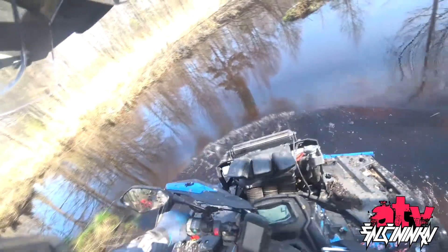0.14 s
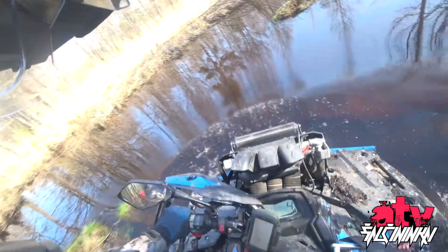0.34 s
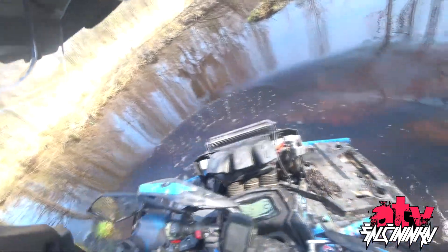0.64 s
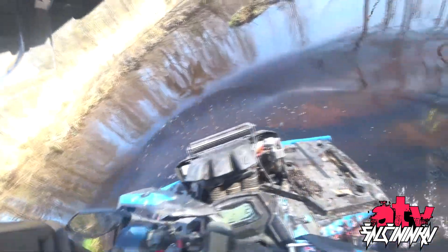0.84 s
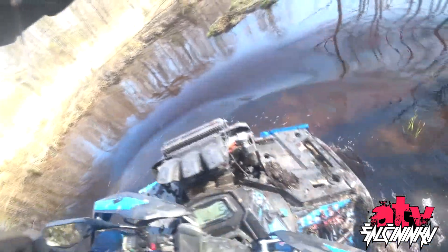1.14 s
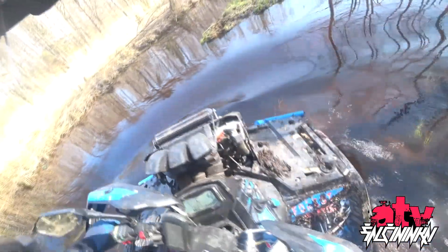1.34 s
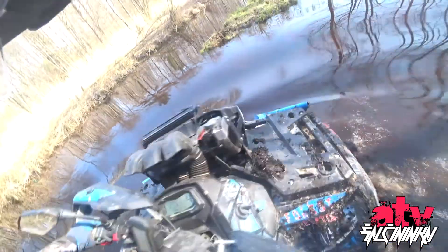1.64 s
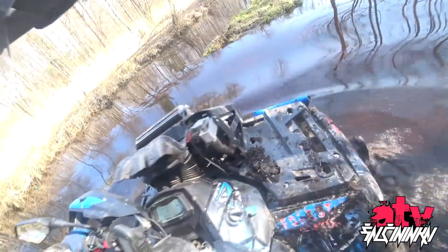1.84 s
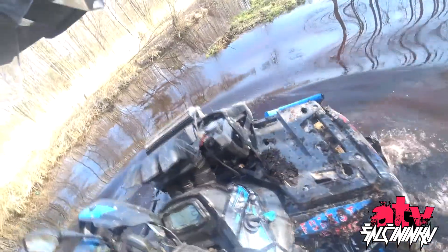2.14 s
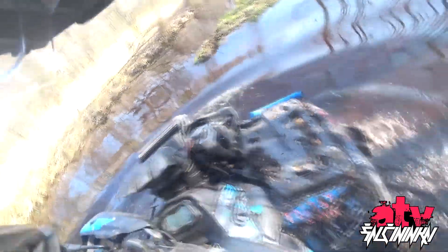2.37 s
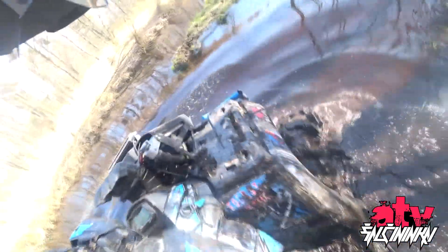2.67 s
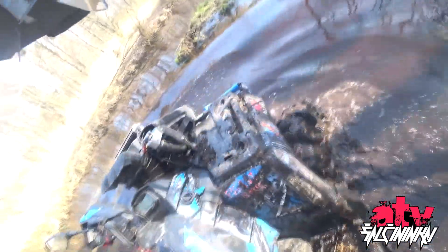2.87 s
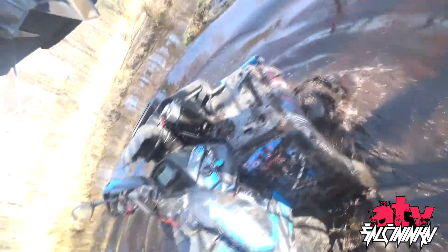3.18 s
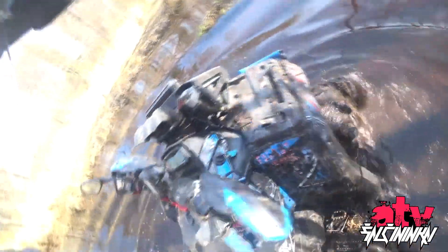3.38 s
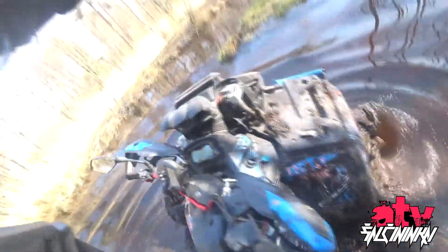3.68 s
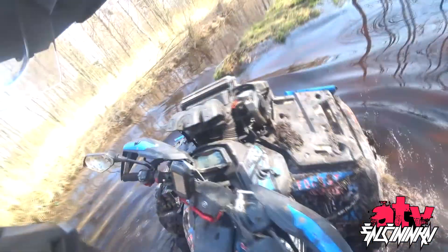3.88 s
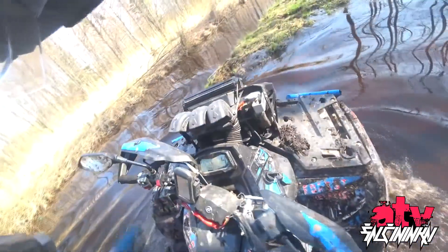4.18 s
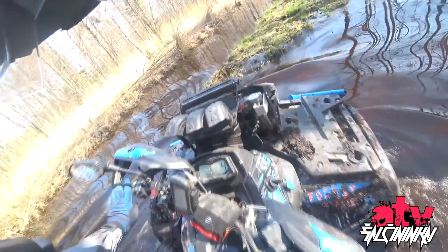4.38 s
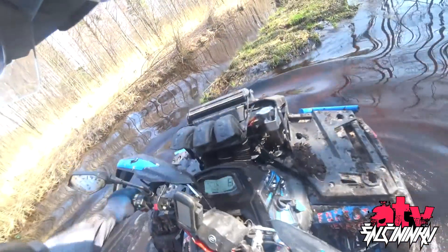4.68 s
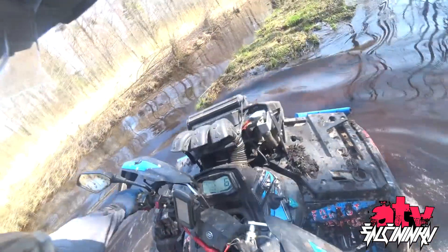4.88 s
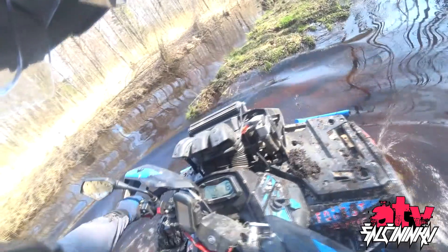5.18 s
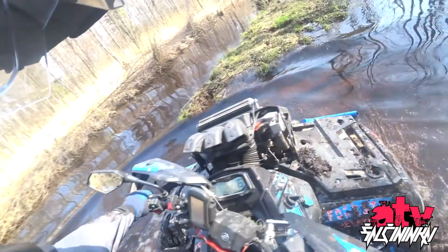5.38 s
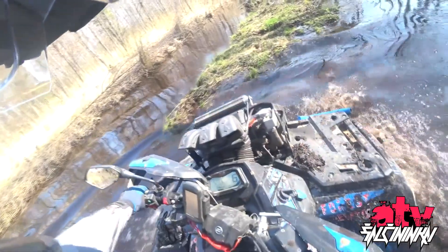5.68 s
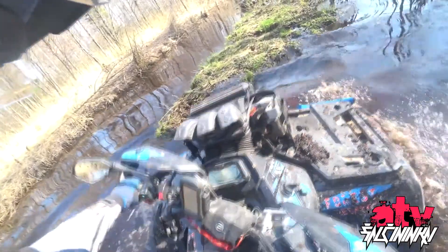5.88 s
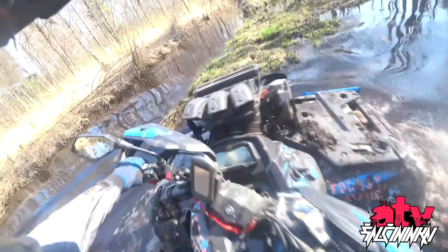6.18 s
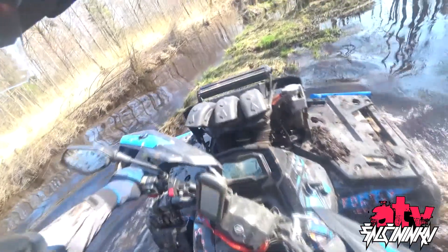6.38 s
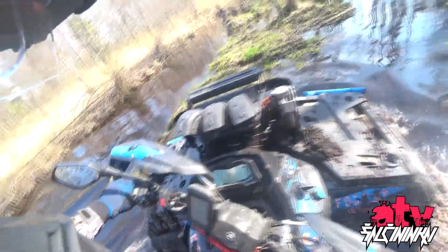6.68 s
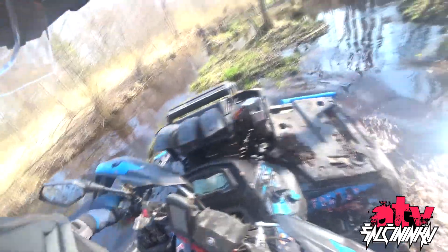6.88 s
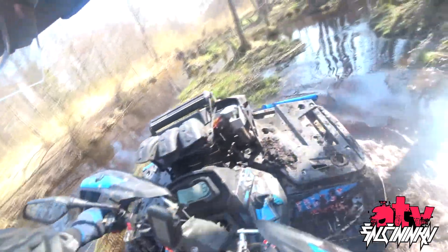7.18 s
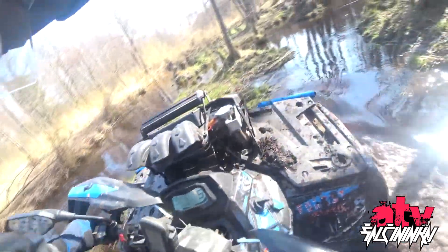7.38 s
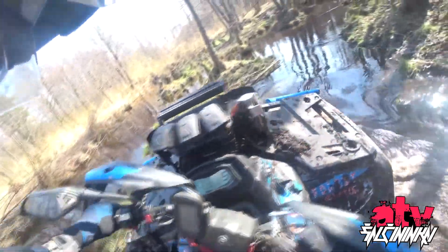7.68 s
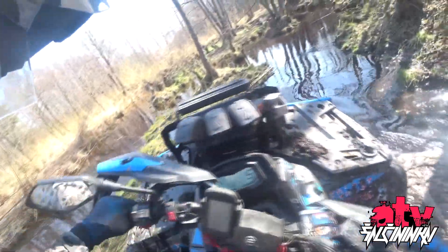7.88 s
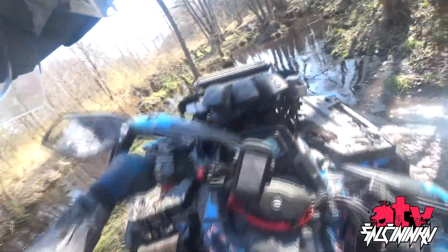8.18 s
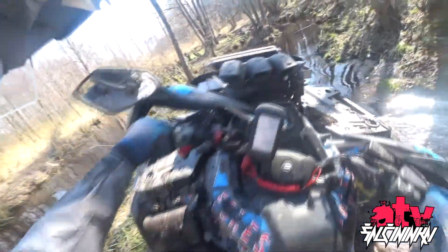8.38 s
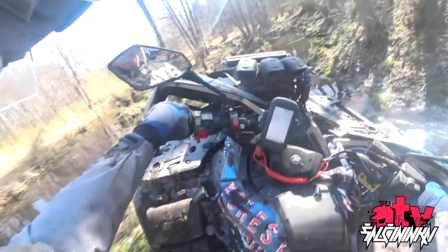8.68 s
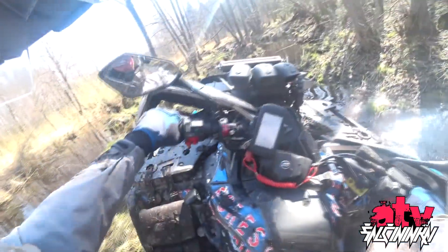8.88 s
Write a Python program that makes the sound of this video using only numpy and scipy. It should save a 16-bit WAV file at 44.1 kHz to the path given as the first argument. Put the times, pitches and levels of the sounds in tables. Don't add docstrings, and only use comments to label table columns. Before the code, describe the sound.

A twin-cylinder quad bike lugs through flooded ground, buzzing and rattling over hissing water, surging, slamming its driveline, revving hard, bogging, then pulling away.

```python
import sys
import numpy as np
from scipy import signal
from scipy.fft import rfft, irfft, next_fast_len
from scipy.io import wavfile
from scipy.ndimage import uniform_filter1d

SR = 44100
rng = np.random.default_rng(int(sys.argv[2]) if len(sys.argv) > 2 else 0)


def master(y):
    cut = np.clip(np.atleast_2d(y).T, -1, 1)
    pcm = np.round(cut * 32767)
    wavfile.write(sys.argv[1], SR, pcm.astype(np.int16))


def to_linear_factor(level_db):
    exponent = np.asarray(level_db, float) / 20
    return 10 ** exponent


N = 398223
FFT_LEN = next_fast_len(N)
TIME, BINS = np.arange(N) / SR, np.fft.rfftfreq(FFT_LEN, 1 / SR)
USUAL_HZ = 24.4

# (time [s], engine cycles per second [Hz])
SPEED = [(0.0, 21.49), (0.65, 20.93), (0.79, 24.92), (1.05, 25.6), (1.32, 25.51), (1.55, 21.24),
         (1.95, 22.27), (2.45, 23.58), (2.9, 22.44), (3.35, 22.46), (3.8, 23.66), (4.25, 22.89),
         (4.6, 24.45), (4.93, 28.36), (5.1, 28.72), (5.42, 31.69), (5.95, 26.04), (6.3, 29.62),
         (6.6, 25.84), (7.0, 26.72), (7.35, 27.39), (7.75, 25.03), (8.05, 24.74), (8.22, 19.49),
         (8.44, 19.69), (8.63, 27.51), (9.03, 26.42)]
# (place in cycle [0-1], strength [dB], front cylinder [1 or 0])
FIRINGS = [
    (.755, 0, 1),
    (.83, -9, 1),
    (.92, -12, 1),
    (.12, 0, 0),
    (.19, -9, 0),
    (.31, -13, 0),
]
# (frequency [Hz], width [Hz], left [dB], right [dB], right leads [rad])
PANELS = [(469, 180, -29, -29, -2.05), (571.2, 30.4, -11.5, -12, -1.33), (691.3, 22.3, -4.5, 0.5, -2.5),
          (710.2, 20.9, -1, 0, -2), (761.4, 66, -9.5, -10, -2.5), (901.4, 48.5, -12, -17.5, -2.5)]
# (frequency [Hz], width [Hz], left [dB], right [dB], right leads [rad])
BODY = [(1030, 70, -8, -11, 3.0), (1145, 80, -5, -7, 1.9), (1281, 65, -3, -6, 2.4), (1395, 80, -8, -6, 2.9),
        (1462, 55, 0, 0, 3.0), (1540, 60, -6, -7, -3.1)]
# (frequency [Hz], width [Hz], left [dB], right [dB], right leads [rad])
FRAME = [(1616.5, 44, 1, -5.5, 4), (1728.4, 46, -5, -3, 0.48), (1826.4, 26, -8, -4, 0.2)]
# (frequency [Hz], width [Hz], left [dB], right [dB], right leads [rad])
COVERS = [(2570, 90, -5, -6, -3.0), (2700, 120, -4, -2, -2.4), (2830, 190, 0, -2, -1.8),
          (3445, 220, -10, -12, 2.9)]
# (frequency [Hz], width [Hz], left [dB], right [dB], right leads [rad])
PORT = [(4220, 240, -38, -53, -4), (5253, 640, 7, 10, -1.85)]
# (start [s], end [s], upper hum [dB], outlet hiss [dB])
SURFACING = [
    (2.4, 4.4, 0, 4),
    (6.15, 7.35, 3.5, -2),
    (7.45, 8.1, 4.5, 5),
    (8.47, 9.03, 5.5, 17),
]


def evened(x):
    return x / np.sqrt(np.mean(x ** 2) + 1e-20)


def column(table, index):
    rows = np.array(table)
    return np.interp(TIME, rows[:, 0], rows[:, index])


def read(points, hz):
    f, value = np.transpose(points)
    return np.interp(np.log(hz + 1), np.log(f + 1), value)


def wander(rate_hz):
    t = TIME[::256]
    rates = np.geomspace(.2, rate_hz, 16)
    slow = sum(np.sin(2 * np.pi * (f * t + rng.random())) / np.sqrt(f) for f in rates)
    return np.interp(TIME, t, evened(slow))


def speed_hz():
    flywheel_s = .12
    return uniform_filter1d(column(SPEED, index=1), round(flywheel_s * SR))


def level_db(part):
    # (time [s], load [dB])
    load = [(0.0, -51.5), (0.53, -50), (1.18, -42.5), (1.61, -42.5), (2.13, -66.5), (2.39, -43.5),
            (4.15, -46), (5.71, -44), (6.36, -41.5), (6.79, -41.5), (7.22, -44), (7.57, -39.5), (7.82, -48),
            (7.9, -44), (8.22, -43.5), (8.65, -38), (8.98, -41), (9.03, -38.5)]
    # (time [s], strain [dB])
    strain = [(0.0, -55.5), (0.4, -58), (0.58, -47.5), (1.18, -42.5), (1.86, -61.5), (2.19, -53),
              (2.21, -48), (2.51, -54.5), (4.1, -46.5), (4.149, -49), (4.5, -44), (5.1, -49), (5.28, -46.5),
              (5.76, -44.5), (5.78, -43), (7.74, -45.5), (8.07, -49.5), (9.03, -51)]
    # (time [s], churn [dB])
    churn = [(0.0, -59), (0.43, -63), (1.18, -54), (2.08, -59), (2.67, -52), (3.95, -50.5), (4.02, -56),
             (5.48, -45.5), (6.41, -51), (6.99, -45), (8.35, -56.5), (8.8, -49), (8.88, -54.5),
             (9.03, -49.5)]
    # (usual level [dB], shares of load, strain and churn [dB per dB], speed [dB per Hz])
    follows = dict(panels=(-38.5, 0.5, 0.0, 0.0, 0.0), body=(-44, 0.11, 0.2, 0.4, 0.03),
               frame=(-45, 0.0, 1, 0.0, 0.0), bracket=(-49.5, 0.42, 1.59, 0.17, 0.45),
               covers=(-56, -0.15, 1.03, 0, 0.34), port=(-51.5, 0.5, 0.0, 1, -0.5),
               exhaust=(-54.5, 0.67, 0.18, -0.16, .5), spray=(-54.5, 0.0, 0.0, 0, 0.5),
               bubbles=(-63.5, 1, 2, -1.5, 1.5), rack=(-67, 0.5, -0.5, -0.5, 1.5),
               outlet=(-78.5, -1, 1.5, 0.5, 1), swell=(0.0, 0.28, 0.013, 0, 0.27),
               fizz=(0.2, 0.046, 0.0, 0.34, 0.19))
    usual_db, *shares, per_hz = follows[part]
    controls = [column(table, index=1) for table in (load, strain, churn)]
    pulled_db = sum(share * (c - c.mean()) for share, c in zip(shares, controls))
    return usual_db + pulled_db + per_hz * (column(SPEED, index=1) - USUAL_HZ)


def spells_db(table, index):
    rise_s = 0.02
    return sum(row[index] * np.clip((TIME - row[0]) / rise_s, 0, 1) * (TIME < row[1]) for row in table)


def sway_db(spells):
    ease_s = 0.076
    steps = sum(db * ((TIME > start) & (TIME < end)) for start, end, db in spells) + np.zeros(N)
    return uniform_filter1d(steps, round(ease_s * SR))


def ring(drive, mode):
    hz, width, left_db, right_db, lead = mode
    off = 2j * (BINS - hz) / width
    peak = 2 * BINS / (BINS + hz) / (1 + off / .75) / (1 + off / 2.5)
    return rfft(drive, FFT_LEN) * peak * [[to_linear_factor(left_db)], [to_linear_factor(right_db) * np.exp(1j * lead)]]


def heard(spectra):
    return evened(irfft(spectra, FFT_LEN)[:, :N])


def engine():
    # (frequency [Hz], width [Hz], left [dB], right [dB], right leads [rad])
    bracket = [(2040, 70, 0, 0, -2.8), (2190, 80, -19, -12, 3.0)]
    # (frequency [Hz], width [Hz], left [dB], right [dB], right leads [rad])
    rack = [(1915, 60, 0, 0, -1.4)]
    # (frequency [Hz], width [Hz], left [dB], right [dB], right leads [rad])
    outlet = [(7100, 500, 0, 0, -.8)]
    # (lag [cycles], front cylinder [dB], rattle [s], steady buzz [gain],
    # clean strike [gain], drift [dB])
    manner = dict(panels=(.06, -5, .010, .45, 6.5, .4), body=(.03, -3, .006, .8, 1.2, 1.0),
              frame=(-.05, 1, .007, .45, 5.5, .4), bracket=(0, -4, .005, .5, 2.2, .6),
              covers=(.09, 3, .004, .65, 1.5, .8), port=(.03, -2, .006, .9, .4, 1.0),
              rack=(0, -2, .005, .5, 2.0, .6), outlet=(.03, -1, .005, .9, .4, .6))
    # (start [s], end [s], level [dB])
    sway = dict(panels=[[], [(1.1, 1.7, 3), (2.3, 3.95, -4), (6.9, 7.3, 5), (4.6, 5.1, 7), (5.7, 5.85, 5.5),
            (6.2, 6.5, -4), (6.55, 6.9, -10), (7.3, 7.8, 7.5)], [(.5, 1.3, -2), (1.35, 2.2, -1.5),
            (2.3, 3.4, 1.5), (4.2, 4.8, -0.5), (5.15, 5.45, 5), (5.9, 6.48, -0.5), (6.5, 7.0, 3),
            (8.28, 8.47, 6.5), (8.47, 9.1, 3.5)], [(.5, 1.3, 0), (1.35, 2.2, -3.5), (2.9, 3.4, 2.5),
            (3.4, 4.4, 1), (5.72, 6.05, 0.5), (5.15, 5.45, -0.5), (5.5, 5.7, 4), (6.1, 6.48, -7.5),
            (6.5, 7.75, 2.5), (8.45, 9.1, 2)], [], [(0.85, 1.6, 1), (5.8, 6.1, 2.5), (5.3, 6.45, 6.5),
            (9.9, 5.1, 6)]], frame=[[(2.45, 2.65, -9), (2.65, 2.9, 4.5), (2.95, 3.6, -2), (3.62, 3.9, 3),
            (4.3, 5.0, -0.5), (5.3, 6.45, -0.5), (6.9, 7.5, -1.5)], [(2.2, 2.42, 3.5), (2.45, 3.6, -2.5),
            (5.4, 5.75, -3), (6.15, 6.45, -5), (6.47, 7.1, 1.5), (7.3, 8.0, 2)], [(2.45, 3.6, 7.5),
            (3.8, 4.85, 4.5), (4.95, 5.25, -3), (5.5, 5.78, -7), (6.3, 6.75, -7), (6.8, 7.5, 3),
            (8.45, 9.1, -5)]])
    # (start [s], end [s], bracket [dB], covers [dB], rack [dB])
    chatter = [
        (.75, 1.32, -0.5, -2.5, 3),
        (2.5, 3.6, 2, 1.5, 12),
        (5.8, 6.25, 2, 3.5, 8),
        (6.5, 7.1, 1, -0.5, -13),
        (7.6, 8.07, 4.5, 2.5, 14.5),
        (8.1, 8.45, 10, 8, 4),
        (8.44, 9.036, 2.5, 12, 1),
    ]
    # (time [s], extra knock [dB])
    clutch = [(2.02, 0), (2.208, -6), (2.215, 1), (2.32, 0), (8.08, 0), (8.11, -3), (8.2, -1), (8.28, -2),
              (8.31, -7), (8.46, -7), (8.48, 0)]
    front_fires_s = 6.858
    turns = np.cumsum(speed_hz()) / SR
    turns = turns + (FIRINGS[0][0] - turns[round(front_fires_s * SR)]) % 1
    parts = dict(panels=PANELS, body=BODY, frame=FRAME, bracket=bracket, covers=COVERS, port=PORT,
                 rack=rack, outlet=outlet)
    extra_db = dict(bracket=spells_db(chatter, index=2), covers=spells_db(chatter, index=3),
                    rack=spells_db(chatter, index=4), outlet=spells_db(SURFACING, index=3))
    bite_db = column(clutch, index=1)
    out = exhaust(turns)
    for name, modes in parts.items():
        gain = to_linear_factor(level_db(name) + extra_db.get(name, 0) + bite_db)
        mode_sway = sway.get(name, [[]] * len(modes))
        out = out + gain * knocked(modes, mode_sway, turns, *manner[name])
    return out


def knocked(modes, sway, turns, late, front_db, rattle_s, steady, clean, drift_db):
    clicks = blows(turns, late, front_db, spread_db=.9, jitter_s=.00012)
    rattle = evened(signal.lfilter([1], [1, -np.exp(-1 / (rattle_s * SR))], clicks))
    strike = clean * evened(clicks)
    buzz = steady * (speed_hz() / USUAL_HZ) ** 2
    spectra = 0
    for mode, spells in zip(modes, sway):
        drive = (buzz + rattle) * rng.standard_normal(N) + strike
        spectra = spectra + ring(to_linear_factor(drift_db * wander(2.5) + sway_db(spells)) * drive, mode)
    return heard(spectra)


def blows(turns, late, front_db, spread_db, jitter_s):
    # (time [s], level [dB])
    front_lean = [(0, -4), (.7, -3.5), (.85, -7.5), (1.3, 1), (1.4, -4), (2.6, -5), (3.5, -2), (5.5, 0),
                  (5.8, 1), (7.5, 3), (8.0, 2), (8.15, -9), (8.2, -1), (8.46, -2), (8.52, 0)]
    clicks = np.zeros(N)
    strength = to_linear_factor(spread_db * rng.standard_normal(int(turns[-1]) + 2))
    for place, db, front in FIRINGS:
        at = np.flatnonzero(np.diff(np.floor(turns - place - late)))
        shift = np.round(jitter_s * SR * rng.standard_normal(len(at))).astype(int)
        lean_db = front * (front_db + column(front_lean, index=1)[at])
        clicks[np.clip(at + shift, 0, N - 1)] = to_linear_factor(db + lean_db) * strength[turns[at].astype(int)]
    return clicks


def exhaust(turns):
    # (engine order, level [dB])
    tones = [(1, -17), (3, -18), (4, -21), (5, 1), (6, 0), (7, -7), (8, 0), (9, -3), (10, -7), (11, -5),
             (12, -6), (13, 0), (14, 5), (15, -14), (16, 0), (17, 4), (18, -3), (19, 3), (20, 3)]
    depth = {5: [(0, 0.63, -1), (1.4, 2.25, -3), (2.3, 8.7, -0.5), (8.05, 8.6, -6), (8.5, 9.1, 3.5)],
             6: [(0, 1.8, -8), (5.1, 5.65, 5), (6.0, 6.5, -8), (8.1, 7.2, -5)], 7: [(.75, 1.8, -8),
             (4.6, 5.1, 3.5), (8.1, 8.5, -8)], 8: [(0.75, 6.5, -2), (4.6, 3.6, 1), (8.1, 9.1, -2.5)],
             9: [(.75, 1.8, -10), (5.1, 5.6, -10), (6.9, 7.7, 5.5)], 10: [(4.6, 6.0, -6), (6.5, 8.1, 3)],
             11: [(2.25, 5.6, 8), (6.9, 7.7, -5), (8.5, 9.1, -11.5)], 13: [(2.7, 4.6, -8), (8.1, 8.5, -6)],
             14: [(0, .6, -9), (.75, 1.3, 4.5), (2.6, 3.1, 4), (4.6, 5.6, -1), (6.5, 7.3, 2.5),
             (7.4, 8.5, -4), (8.5, 9.1, -5)], 16: [(2.3, 4.2, 5.5), (4.6, 6.4, 3), (6.5, 9.1, -7.5)],
             17: [(0, 4.6, -10), (4.6, 6.7, 2), (7.7, 8.5, -8)], 19: [(0, 4.7, -13), (4.6, 6.8, 1),
             (7.7, 8.5, -8)], 20: [(3.1, 4.6, -14), (7.7, 8.5, -13)]}
    # (frequency [Hz], width [Hz], left [dB], right [dB], right leads [rad])
    pipe = [(122, 100, -7, -6, .4), (188, 36, -1, 1, .1), (218, 55, -6, -3, .8), (290, 70, -11, -10, .2),
            (400, 220, -12, -11, -.2)]
    # (frequency [Hz], width [Hz], left [dB], right [dB], right leads [rad])
    swirl = [(91, 91, -12, -12, 0.38), (187, 36, -0.5, 5, 0.12), (287, 71, -5, -7.5, 0.22)]
    # (start [s], end [s], gurgle [dB])
    drained = [(4.6, 9.1, -1.5)]
    hum = 0
    for order, db in tones:
        waver = to_linear_factor(db + 2 * wander(3.0) + sway_db(depth.get(order, [])))
        hum = hum + waver * np.cos(2 * np.pi * order * (turns - .9))
    clear = hum * to_linear_factor(spells_db(SURFACING, index=2))
    piped = heard(sum(ring(clear if mode[0] > 200 else hum, mode) for mode in pipe))
    noise = rng.standard_normal((len(swirl), N)) * to_linear_factor(1.7 * wander(9.3) + sway_db(drained))
    gurgle = heard(sum(ring(n, mode) for n, mode in zip(noise, swirl)))
    return to_linear_factor(level_db("exhaust")) * piped + to_linear_factor(-59) * gurgle


def impacts():
    # (time [s], peak [dB])
    cracks = [
        (1.275, -34),
        (2.809, -32),
        (2.814, -34),
        (2.885, -29.5),
        (3.993, -37.5),
        (4.081, -39.5),
        (4.469, -43),
        (4.509, -39),
        (7.805, -43),
    ]
    # (frequency [Hz], width [Hz], left [dB], right [dB], right leads [rad])
    plate = [(510, 120, -4, -6, -.5), (720, 80, -8, -4, -1.5), (970, 76, 3, -4, -1.2),
             (1266, 100, -0.5, 4, 1.87), (1596, 100, 4, 0, 1.4), (1870, 260, -10, -7, -.2)]
    # (time [s], panels [dB], frame [dB], covers [dB])
    slam_times = [(2.212, -46, -37, -45), (2.236, -59, -40, -53), (2.273, -59, -48, -48),
                  (2.294, -45, -42, -52), (8.106, -38, -40, -52), (8.2, -42, -38, -51),
                  (8.25, -40, -37, -55), (8.299, -36.5, -44, -57), (8.348, -36, -35, -45),
                  (8.4, -34, -35.5, -47), (8.451, -32, -40, -41), (8.478, -52, -41, -44),
                  (8.498, -44, -51, -41)]
    # (frequency [Hz], width [Hz], left [dB], right [dB], right leads [rad])
    braced = [(698, 40, 1, 3, -2), (1730, 93, 2, -1, 0.1), (2800, 180, -2, -2, -2)]
    slams = sum(struck(slam_times, index=k + 1, modes=[mode]) for k, mode in enumerate(braced))
    return struck(cracks, index=1, modes=plate) + slams


def struck(table, index, modes):
    hits = np.zeros(N)
    for row in table:
        hits[round(row[0] * SR)] = to_linear_factor(row[index])
    response = sum(ring(np.ones(1), mode) for mode in modes)
    peak = abs(irfft(response.mean(0))).max()
    return irfft(response * rfft(hits, FFT_LEN), FFT_LEN)[:, :N] / peak


def slaps():
    # (time [s], level [dB],
    # brightness [dB])
    slap_times = [(0.44, -42, -24), (0.476, -54, -24), (2.566, -46, -26), (3.67, -41.5, -10.5),
                  (3.95, -45, -8), (4.719, -35, -20), (4.859, -33.5, -13.5), (5.067, -40, -11),
                  (5.18, -45, -7), (4.452, -47, -6), (5.274, -37, -25), (5.37, -47, -17), (6.551, -37, -31),
                  (7.535, -35, -14), (8.349, -41, -11), (8.4, -44, -9), (8.452, -44, -10)]
    # (frequency [Hz], width [Hz], left [dB], right [dB], right leads [rad])
    sparkle = [(8000, 4000, -16, -15, 0)]
    s, db, bright_db = np.transpose(slap_times)
    at = np.round(s * SR).astype(int)
    thud = (PANELS + BODY + FRAME, db - 9, .002)  # modes, level dB, decay s
    splash = (COVERS + PORT + sparkle, db + bright_db - 3, .005)
    out = 0
    for modes, hit_db, decay_s in (thud, splash):
        hits = np.zeros(N)
        hits[at] = to_linear_factor(hit_db)
        response = sum(ring(np.ones(1), mode) for mode in modes)
        scale = np.sqrt(np.mean(abs(response.mean(0)) ** 2))
        decay = signal.lfilter([1], [1, -np.exp(-1 / (decay_s * SR))], hits)
        push = decay * rng.standard_normal(N) + 32 * hits
        out = out + irfft(response * rfft(push, FFT_LEN), FFT_LEN)[:, :N] / scale
    return out


def droplets(per_s, size_db):
    clicks, at = np.zeros(N), np.flatnonzero(rng.random(N) < per_s / SR)
    size = to_linear_factor(size_db * np.minimum(rng.exponential(1, len(at)), 4))
    clicks[at] = size * rng.choice([-1., 1.], len(at))
    return clicks


def sheets():
    # (start [s], end [s], level [dB])
    passes = [
        (1.3, 1.75, -56),
        (4.7, 5.05, -53),
        (6.7, 7.0, -55),
        (7.58, 8.07, -47.5),
    ]
    # (frequency [Hz], width [Hz], left [dB], right [dB], right leads [rad])
    fender = [(1100, 500, -5, -7, 2.4), (2150, 250, 0, -3, 2.4), (2500, 300, 1, -3, -2.2)]
    passing = sum(to_linear_factor(db) * (TIME > start) * (TIME < end) for start, end, db in passes)
    drops = droplets(per_s=1200, size_db=6.0) * to_linear_factor(2.0 * wander(17.0))
    return uniform_filter1d(passing, 900) * heard(sum(ring(drops, mode) for mode in fender))


def spray():
    drops = droplets(per_s=2500, size_db=2.0) * to_linear_factor(1.5 * wander(8.0))
    return to_linear_factor(level_db("spray")) * heard(sum(ring(drops, mode) for mode in PORT))


def bubbles():
    # (time [s], frequency [Hz], level [dB])
    gulps = [
        (2.57, 466, -39.5),
        (4.779, 432, -42),
        (4.82, 70.8, -57),
        (6.547, 480, -36),
        (8.55, 312, -43),
    ]
    t, out = np.arange(4000) / SR, np.zeros((2, N))
    for k, hz in enumerate(np.geomspace(450, 2400, 16)):
        tone = np.sin(2 * np.pi * hz * t * (1 + 6.0 * t)) * np.exp(-t * hz / 7.0)
        out[k % 2] += signal.oaconvolve(droplets(per_s=20.0, size_db=2.2), tone)[:N]
    out = to_linear_factor(level_db("bubbles")) * evened(out - .3 * out[::-1])
    for s, hz, db in gulps:
        part = out[:, round(s * SR):][:, :len(t)]
        life = 8 / hz * 0.33
        swell = t / life * np.exp(-t / life)
        part += to_linear_factor([[db + 7.0], [db + 6.0]]) * np.sin(2 * np.pi * hz * t * (1 + 1.2 * t)) * swell
    return out


def wash():
    # (frequency [Hz], density [dB per Hz])
    colour = [(20, -40), (60, -17), (200, -52.5), (500, -8.5), (1500, -12.5), (2400, -18), (3900, -26),
              (6500, -29.5), (8700, -34.5), (10000, -33.5), (11000, -33)]
    # (frequency [Hz], correlation [-1 to 1])
    likeness = [(30, .9), (150, .92), (300, .7), (600, -.3), (3500, -.5), (7500, .3), (11000, .4)]
    frames, hz = N // 128 + 5, np.fft.rfftfreq(512, 1 / SR)
    a, b, c, d, patches = rng.standard_normal((frames, 257, 5)).T
    patches = evened(uniform_filter1d(uniform_filter1d(patches, 8, 0), 16, 1))
    flicker = evened(uniform_filter1d(rng.standard_normal(frames), 6))
    at = np.minimum(np.arange(frames) * 128, N - 1)
    low_db, high_db = level_db("swell")[at], level_db("fizz")[at]
    treble = np.clip(np.log(hz[:, None] / 1500 + 1e-9) / 0.32, 0, 1)
    slow_db = (1 - treble) * low_db + treble * high_db
    same = np.clip(read(likeness, hz), -1, 1)[:, None]
    left = a + 1j * b
    z = np.array([left, same * left + np.sqrt(1 - same ** 2) * (c + 1j * d)])
    z *= to_linear_factor(read(colour, hz)[:, None] + slow_db + 1.17 * patches + 1.0 * flicker)
    return to_linear_factor(-44.0) * evened(signal.istft(z, nperseg=512, noverlap=384)[1][:, :N])


def scene():
    return engine() + impacts() + slaps() + sheets() + spray() + bubbles() + wash()


def roll_off(x):
    return signal.sosfilt(signal.butter(12, 12370, fs=SR, output="sos"), x)


def record(dry):
    edge = signal.firwin(1023, 11070, window=("kaiser", 9), fs=SR)
    limited = signal.oaconvolve(dry, edge[None], "same")
    limited = signal.sosfilt(signal.butter(1, 45, "high", fs=SR, output="sos"), limited)
    return roll_off(limited)


dry = scene()
out = record(dry)
master(out)
```